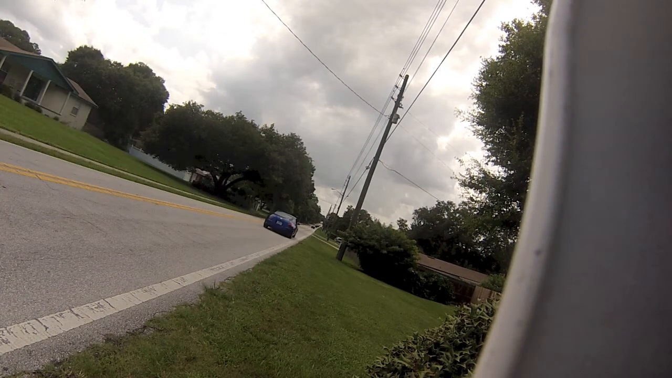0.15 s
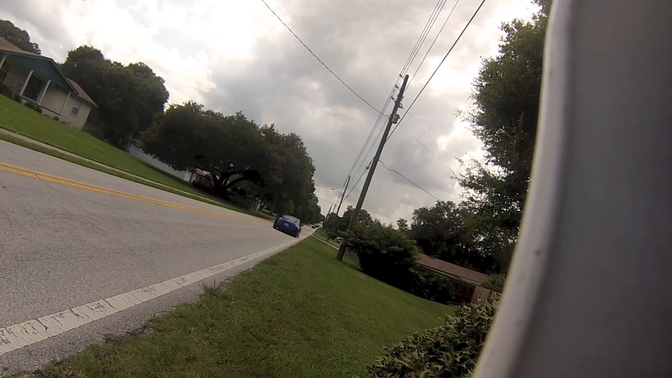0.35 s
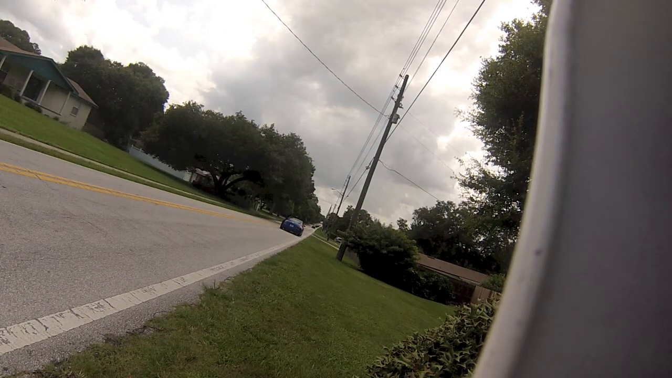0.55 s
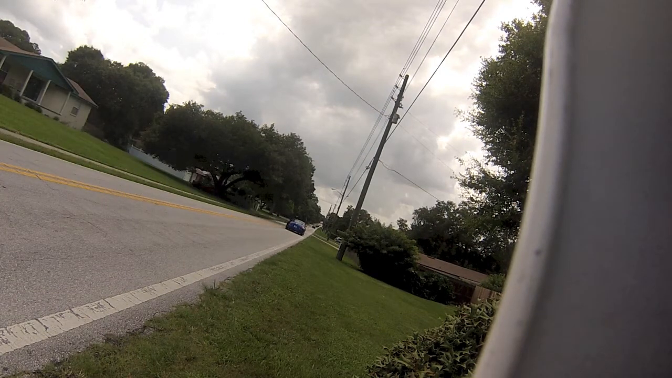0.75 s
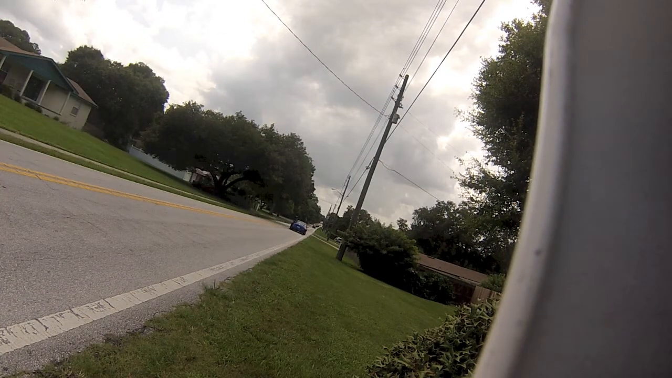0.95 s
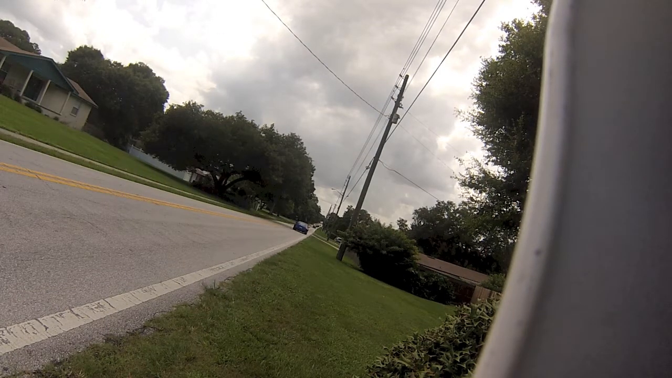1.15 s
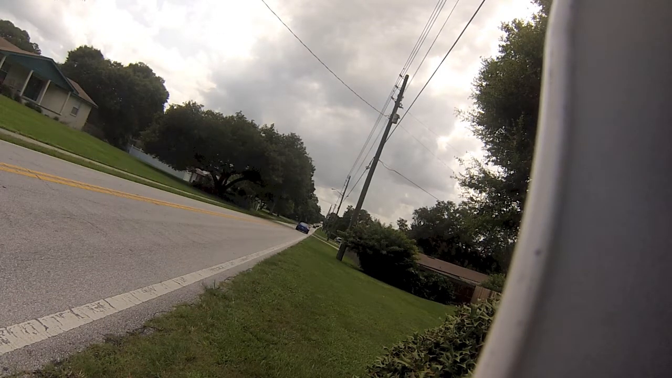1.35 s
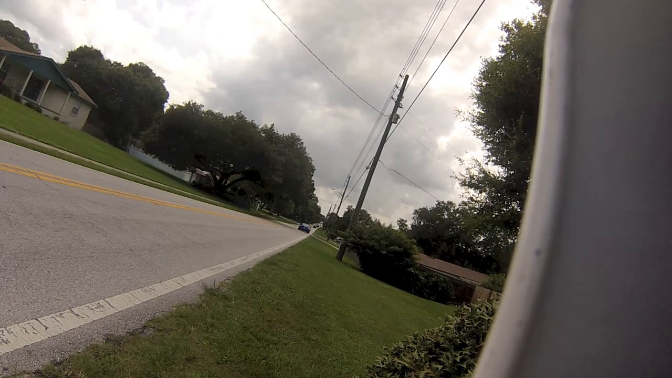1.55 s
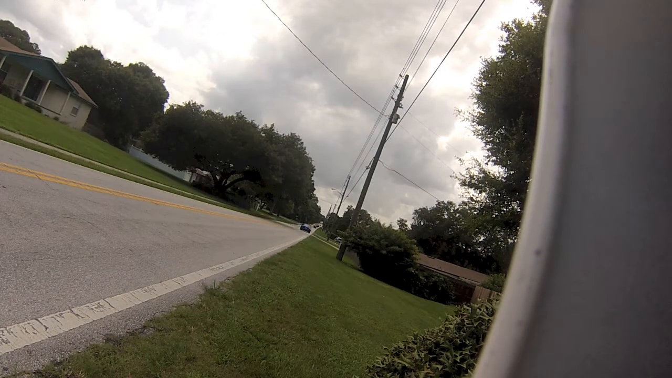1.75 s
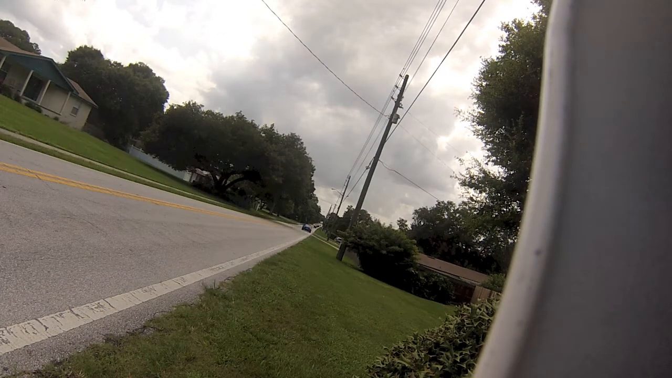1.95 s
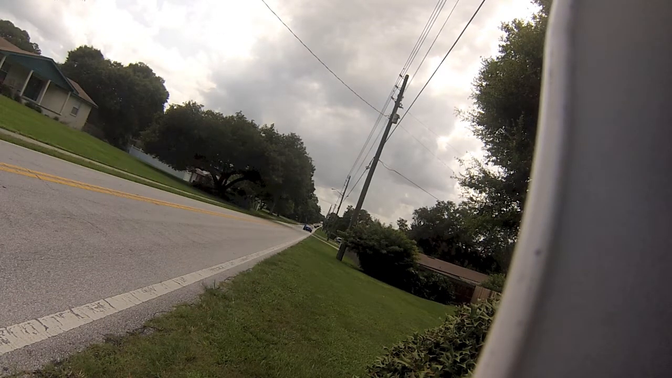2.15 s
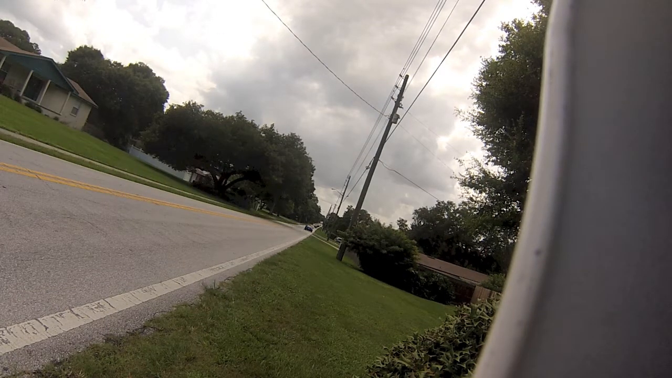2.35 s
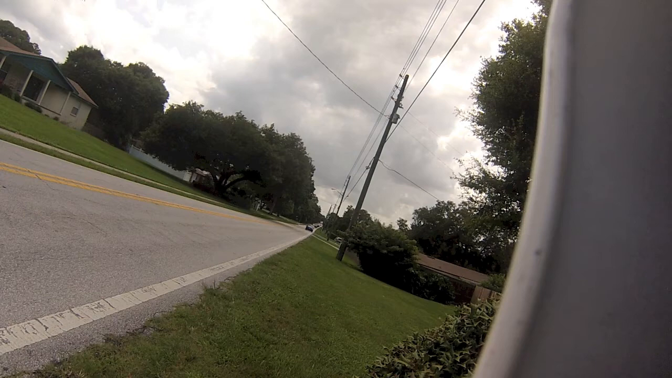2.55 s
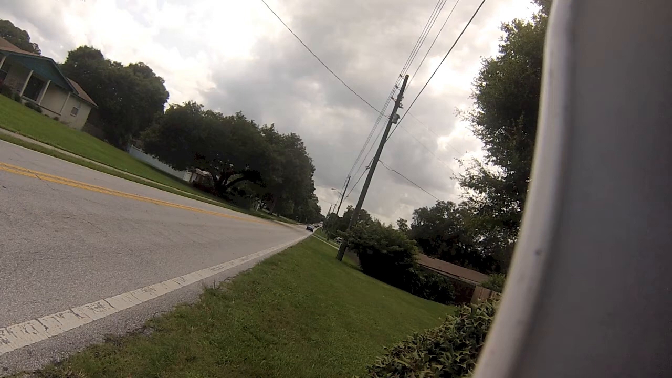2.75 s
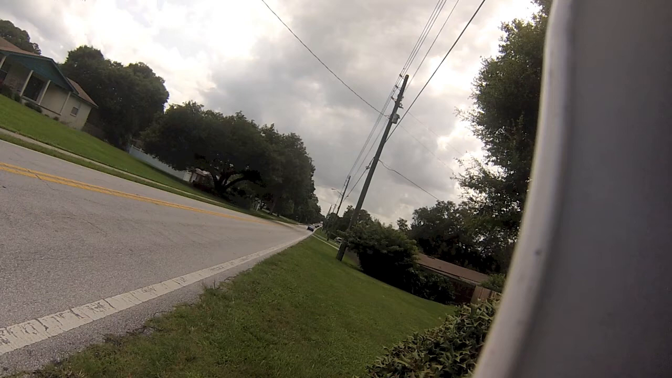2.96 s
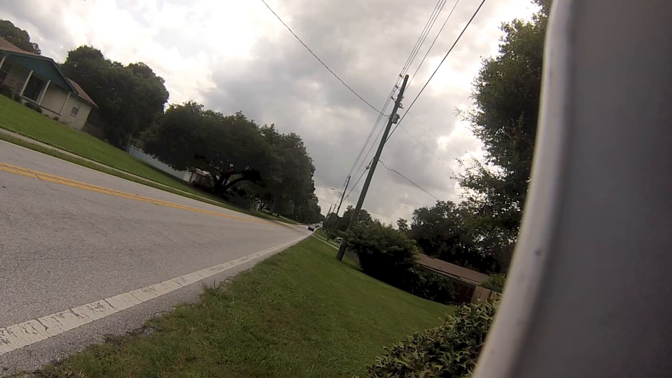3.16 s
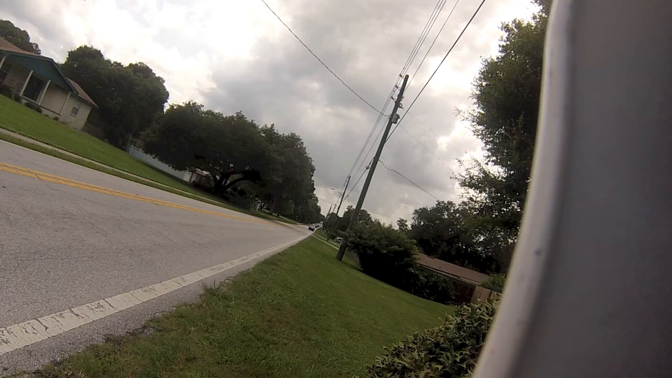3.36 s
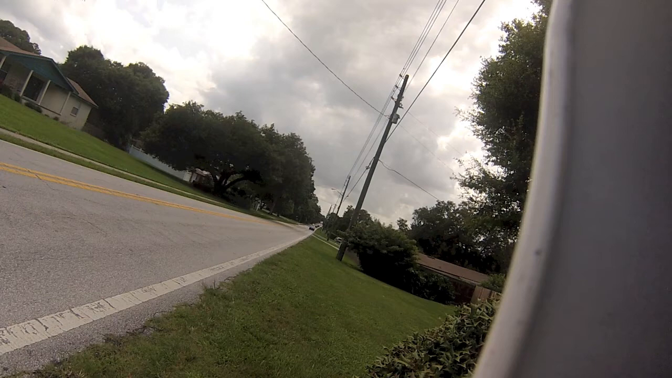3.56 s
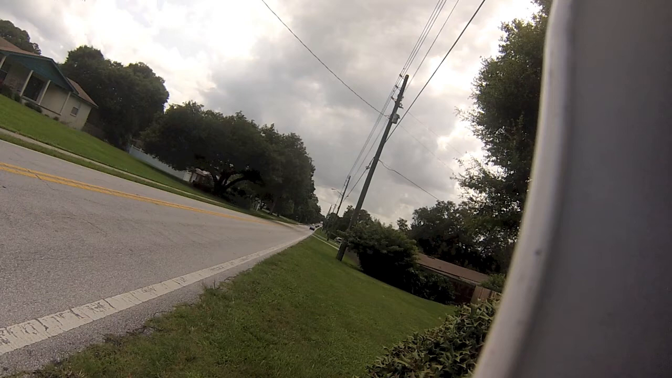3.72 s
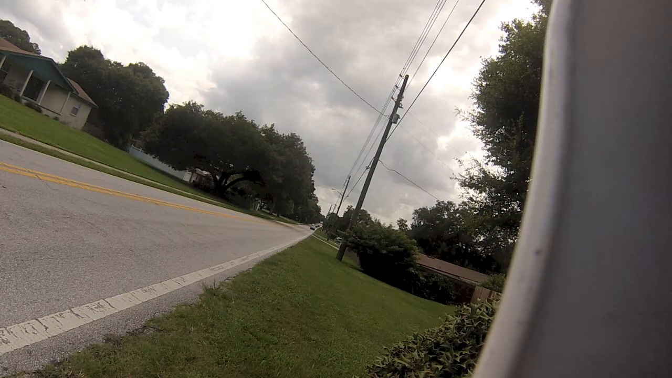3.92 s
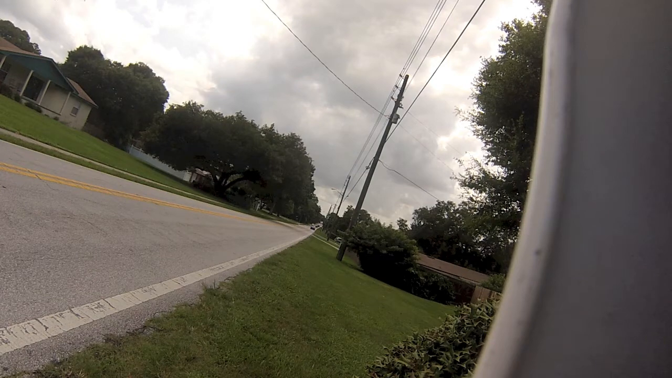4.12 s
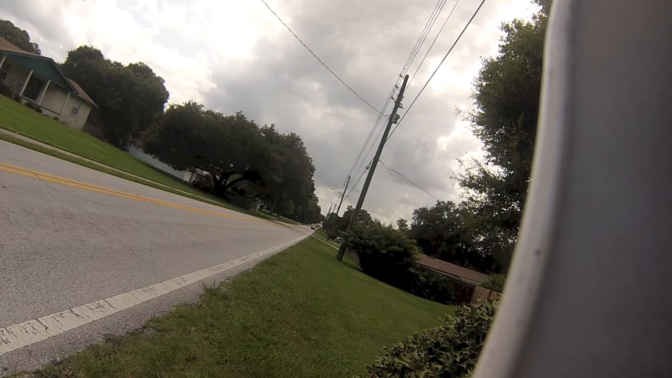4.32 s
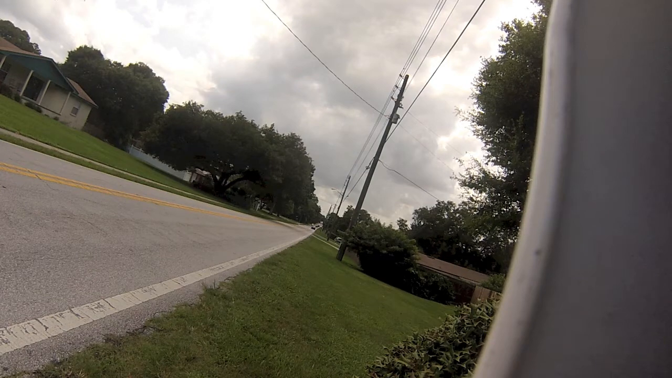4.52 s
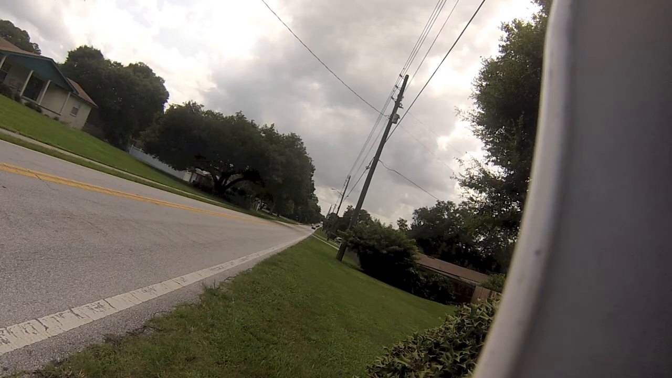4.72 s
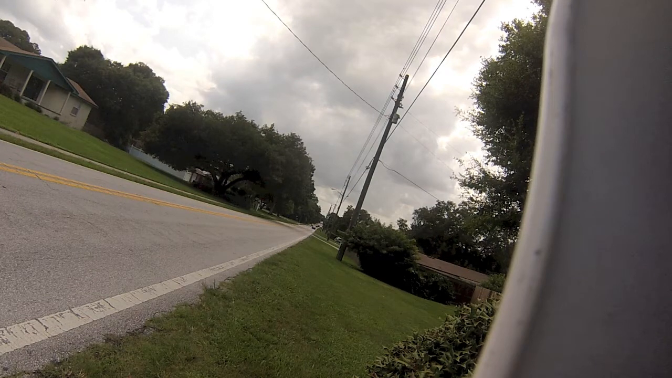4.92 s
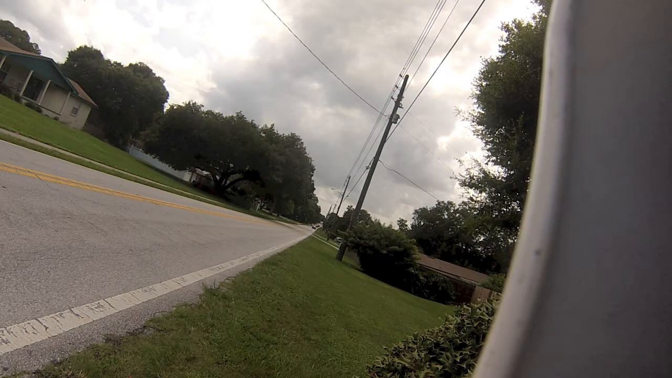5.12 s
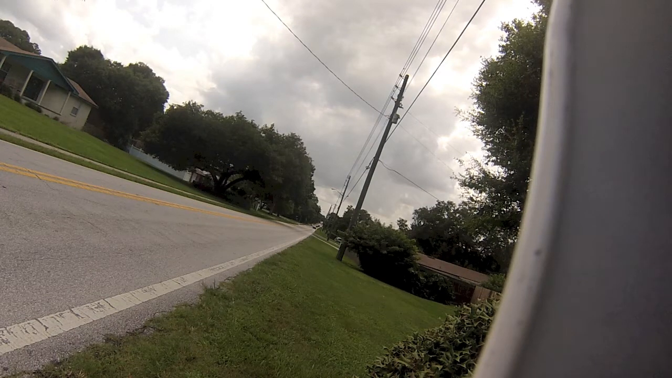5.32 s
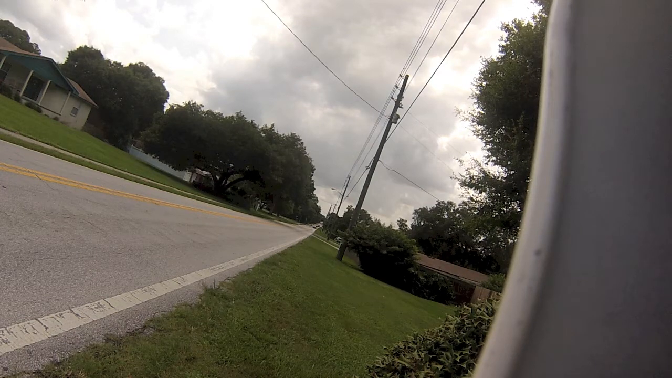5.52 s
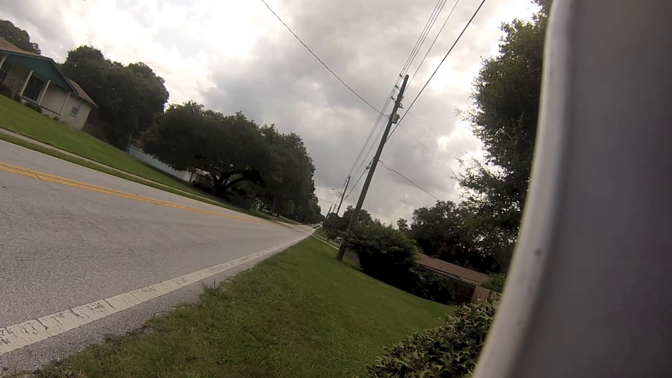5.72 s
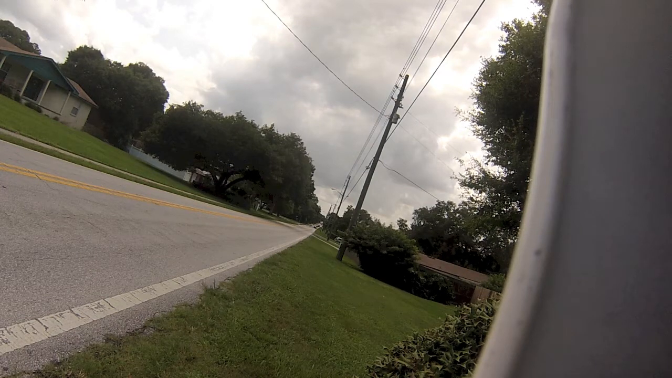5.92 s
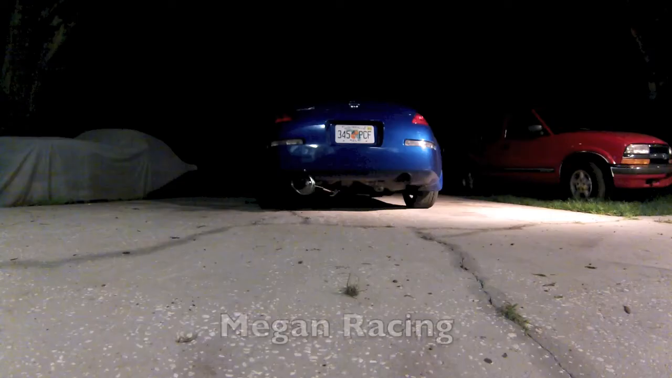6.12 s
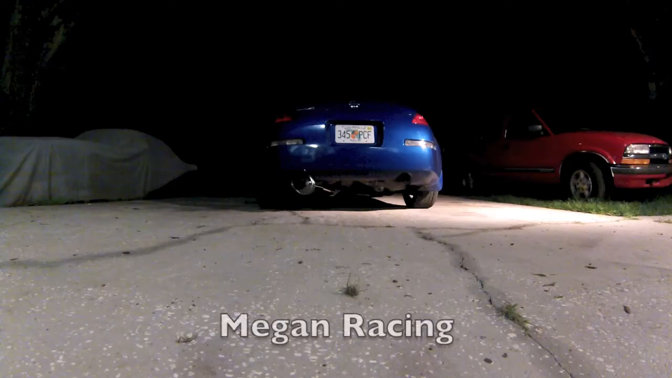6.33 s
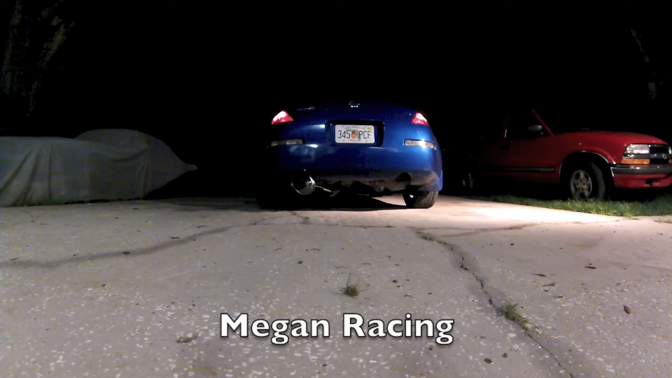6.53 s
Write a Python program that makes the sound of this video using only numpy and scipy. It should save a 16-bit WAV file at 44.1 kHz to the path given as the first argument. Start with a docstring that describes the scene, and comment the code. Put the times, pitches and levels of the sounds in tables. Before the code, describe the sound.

A sports car pulls away down a road, shifts and fades as another car nears, then quiet night air and a starter motor cranking.

```python
"""On a country road a six-cylinder sports car pulls away, lifts off, shifts up and pulls again into the distance.
The engine is a stack of wavering tones locked to the firing rate; tyres, gas and wind are shaped noise.
A tyre roar swells as another car nears, insects sing thinly, and the road fades out.
Then a driveway at night fades in: still air and insects, a soft knock of dying noise, the noisy clack of a starter,
its whine of gear tones that sags once, and the first chuffs of the exhaust as low ringing modes."""
import sys
import numpy as np
from scipy import signal
from scipy.fft import rfft, irfft, next_fast_len
from scipy.io import wavfile
from scipy.ndimage import uniform_filter1d

SR = 44100
rng = np.random.default_rng(int(sys.argv[2]) if len(sys.argv) > 2 else 0)


def inscribe(sig):
    """Save sig as 16-bit PCM at rate SR to the path in sys.argv[1].

    A 1-D sig is mono; a 2-D sig holds one channel per row.
    Samples are clipped to [-1, 1] before scaling.
    """
    pcm = np.round(np.clip(np.atleast_2d(sig).T, -1, 1) * 32767)
    wavfile.write(sys.argv[1], SR, pcm.astype(np.int16))


N = 294588
T = np.arange(N) / SR  # time of each sample, s

# Peaks and hollows from reflections beside the listener: (frequency [Hz], width [Hz], level [dB])
REFLECTIONS = [(315, 20, -3.1), (590, 30, -6.5), (825, 65, 6.3), (925, 35, -9.1), (1155, 120, 5.0),
               (1315, 75, -5.6), (1570, 75, 2.9), (1695, 25, -5.9), (1845, 50, 4.2), (1985, 35, -3.2),
               (2115, 45, 2.3), (2255, 75, -6.6), (2490, 60, -6.4), (2660, 85, 3.3), (3005, 60, 5.4),
               (3230, 45, 1.0), (3485, 40, 3.4), (3875, 130, -3.7), (5455, 315, 4.3), (5765, 40, -3.5),
               (6635, 90, -3.1), (7055, 120, 1.2)]


def exhaust(firing_hz):
    """Gas pulses sound a boom at the firing rate, its echo and octave, and weaker lines at other multiples."""
    # Boom's resonance in the exhaust: (frequency [Hz], level [dB])
    boom_resonance = [(190, -6), (205, 0.5), (215, 1), (229, -3), (243, -5.5), (254, -6), (265, -8),
                      (272, -13), (279, -23)]
    # Resonance that the octave crosses: (frequency [Hz], level [dB])
    octave_resonance = [(390, -23), (412, -16), (444, -16), (468, -5), (490, 0.5), (512, -6.5), (530, -2),
                        (548, -13.5), (564, -19)]
    # Lines from unequal cylinders, six firings to a cycle:
    # (multiple of the cycle rate [-], level against the low lines' gain [dB], roughness [0 = steady])
    low_orders = [(2, -12, 1), (3, -1, 0.3), (4, -8, 0.37), (5, -22, 1), (7, -15.5, 1), (8, -23.5, 1),
                  (9, -18, 0.4), (10, -29, 1), (11, -14, 0.84), (13, -12.5, 0.8), (14, -47.5, 1)]
    # Overtones, most of them of the firing rate:
    # (multiple of the cycle rate [-], level against the high lines' gain [dB], roughness [0 = steady])
    high_orders = [(18, -0.5, 1.3), (21, -18, 0.9), (24, -5, 1), (27, -20, 0.9), (30, -4.5, 0.43),
                   (36, -9, 1)]
    # The muffler's drone lifts any low line that passes through it: (frequency [Hz], width [Hz], level [dB])
    muffler_drone = [(216.4, 27.5, 15.5)]
    # Levels at the starting distance and full throttle, before the resonances
    boom_db, octave_db, low_lines_db, high_lines_db = -13, -23.5, -33, -35.5
    low_lines_db_per_octave = 4  # the low lines grow with engine speed
    high_lines_falloff = 1.79  # power of nearness: the high lines fade faster with distance
    overrun_share = 0.18  # share of the boom left with the throttle shut
    loaded_roughness, added_burble = 0.085, 0.74  # the second comes in as the throttle shuts
    echo_share, echo_shift_hz, echo_fade_s = 0.4, 3.16, 1.8

    gas = throttle()
    effort = overrun_share + (1 - overrun_share) * gas
    burble = loaded_roughness + added_burble * (1 - gas) ** 1.8
    firings = np.cumsum(firing_hz) / SR
    cycles = firings / 6
    cycle_hz = firing_hz / 6

    # The roadside echo is less Doppler-shifted, so it beats against the boom; it dies as the car leaves
    echo_tone = line(firings + echo_shift_hz * T, rough=0.45, flutter_hz=29)
    echo = echo_share * np.exp(-T / echo_fade_s) * echo_tone
    boom_gain = amp(boom_db + read(boom_resonance, firing_hz))
    boom = boom_gain * (line(firings, rough=burble, flutter_hz=32.3) - echo)
    octave_gain = amp(octave_db + read(octave_resonance, 2 * firing_hz))
    octave = octave_gain * line(2 * firings, rough=0.35, flutter_hz=12)

    low = sum(amp(db + peaks(muffler_drone, k * cycle_hz)) * line(k * cycles, rough, flutter_hz=2.6)
              for k, db, rough in low_orders)
    # These glow and fade as they cross the reflections' peaks and hollows
    high = sum(amp(db + peaks(REFLECTIONS, k * cycle_hz)) * line(k * cycles, rough, flutter_hz=10.0)
               for k, db, rough in high_orders)
    pulling = np.clip((gas - 0.35) / 0.32, 0, 1)  # overtones need the engine under load
    octaves_up = np.log2(firing_hz / firing_hz[0])
    low_gain = gas * amp(low_lines_db + low_lines_db_per_octave * octaves_up)
    high_gain = pulling * amp(high_lines_db) * nearness() ** high_lines_falloff
    return nearness() * (effort * boom + low_gain * low + pulling * octave) + high_gain * high


def firing_rate():
    """Firings per second through a long pull, a lift and upshift, a gentler pull, then coasting."""
    # Engine speed: (time [s], firing rate [Hz])
    firing_track = [(0, 192.8), (0.4, 212.8), (0.85, 233), (1.5, 256.4), (2.24, 286.8), (2.42, 276.4),
                    (2.9, 238.1), (3.03, 204.6), (3.5, 216.4), (4.25, 231.4), (4.55, 227.6), (6.05, 219.3)]
    return curves(firing_track)[0]


def throttle():
    """How far the driver's foot opens the throttle, 0-1."""
    # The driver's foot: (time [s], throttle [0-1])
    foot = [(2.24, 0.96), (2.38, 0.28), (2.95, 0.46), (3.05, 0.95), (3.9, 0.62), (4.48, 0.56), (4.68, 0)]
    return np.clip(curves(foot)[0], 0, 1)


def nearness():
    """Sound weakens in proportion to distance as the car drives straight away; gain 1 at the start."""
    start_m, speed_m_per_s = 18.44, 18.64
    return start_m / (start_m + speed_m_per_s * T)


def road(firing_hz):
    """Tyre roar, a low rush of gas and air, and hiss that pulses with the firings under load."""
    # Road noise: (time [s], tyre roar level [dB], hiss level [dB])
    road_levels = [(0, -34.5, -39.5), (.35, -36.5, -45), (.6, -41, -43), (1.0, -38.5, -44),
                   (2.2, -40.5, -45.5), (2.4, -39, -51), (3.3, -40, -51), (3.9, -37.5, -48.5),
                   (4.9, -44.5, -55)]
    # Spectrum of the tyre roar: (frequency [Hz], level per Hz [dB])
    roar_spectrum = [(350, -22), (500, -0.5), (700, -3.5), (850, 3), (1130, 3), (1400, -3), (1850, -14),
                     (2400, -21.5), (4000, -52)]
    # Spectrum of the low rush: (frequency [Hz], level per Hz [dB])
    rush_spectrum = [(50, -2), (100, 5.5), (170, -14.5), (230, 16.5), (300, 2), (380, -7.5), (480, 12.5),
                     (700, -6), (1000, 0), (1800, -42)]
    # Spectrum of the hiss: (frequency [Hz], level per Hz [dB])
    hiss_spectrum = [(1100, -5.5), (1650, 8.5), (2300, 2.5), (2900, 1.5), (3900, -2.5), (5400, -6.5),
                     (6500, -10.5), (7600, -17), (9200, -28.5), (10400, -22.5), (11300, -28.5),
                     (13000, -36), (15000, -36)]
    # Spectrum of the throttle's fizz: (frequency [Hz], level per Hz [dB])
    fizz_spectrum = [(3600, -25), (4450, 10), (5200, 7.5), (6000, -1), (7400, 3), (8800, -5.5),
                     (10000, -0.5), (12200, -9), (14000, -28.5), (15000, -25)]
    rush_db, fizz_db = -28.5, -47  # at the starting distance; the fizz at full throttle

    gas, near = throttle(), nearness()
    roar_db, hiss_db = curves(road_levels)
    roar = amp(roar_db) * noise(roar_spectrum, patchy_db=0.26, roadside=True)
    rush = amp(rush_db) * near ** 1.94 * noise(rush_spectrum, patchy_db=-2.4, roadside=True)
    hiss = amp(hiss_db) * noise(hiss_spectrum, patchy_db=0.76, roadside=True)
    fizz = amp(fizz_db) * near * gas ** 3.4 * noise(fizz_spectrum, roadside=True)
    rasp = 1 + 0.18 * gas * near * np.cos(2 * np.pi * np.cumsum(firing_hz) / SR)
    return roar + rush + (hiss + fizz) * rasp


def starter():
    """The pinion clacks in, the gears whine up and sag against compression, and the pipe chuffs."""
    # Solenoid and pinion strike home: (time [s], level [dB], time to fall 60 dB [s])
    clack_blows = [(6.378, -41.5, 0.23), (6.386, -31.5, 0.18), (6.417, -30, 0.23)]
    # Spectrum of the clacks: (frequency [Hz], level per Hz [dB])
    clack_spectrum = [(60, -5), (200, 4), (500, -6), (1200, 2), (2200, 0.5), (2800, 6.5), (3300, -1.5),
                      (4300, -1), (5300, -12), (7500, -12), (11000, -17.5), (15000, -19)]
    # Whine of the gear teeth: (multiple of the gear-mesh rate [-], level against the whine's gain [dB])
    gear_tones = [(1, -16), (2, -3.5), (4, -6.5), (7, -18), (8, -3.5), (10, -16)]
    # Spectrum of the gear rattle: (frequency [Hz], level per Hz [dB])
    rattle_spectrum = [(60, -17), (200, -0.5), (400, -3.5), (1000, -1), (2000, -1.5), (2500, -6.5),
                       (3300, -0.5), (4500, -11.5), (7000, -17.5), (10000, -23), (15000, -30)]
    # First puffs from the tailpipe: (time [s], level [dB])
    puffs = [(6.557, -26.5), (6.598, -33), (6.639, -57)]
    # The pipe's low modes: (frequency [Hz], level against the puff [dB], time to fall 60 dB [s])
    pipe_modes = [(25.1, 0, 0.32), (63.8, -1.5, 0.3)]
    # The motor spins up towards its free gear-mesh rate; the pinion meshes a moment later
    motor_on_s, meshed_s, free_mesh_hz, spin_up_s = 6.405, 6.42, 790, 0.168
    # The first compression stroke drags it down; the sag is the share of speed lost
    compression_s, half_width_s, sag = 6.68, 0.053, 0.335
    # Gear levels, and how much each gains under compression
    whine_db, whine_strain_db, rattle_db, rattle_strain_db = -39, 8.5, -40.5, 3

    blows = sum(amp(db) * dying(s, t60) for s, db, t60 in clack_blows)
    clacks = noise(clack_spectrum, patchy_db=4.0) * blows

    strain = np.exp(-((T - compression_s) / half_width_s) ** 2)
    spin_up = 1 - np.exp(-np.maximum(T - motor_on_s, 0) / spin_up_s)
    speed = spin_up * (1 - sag * strain)
    teeth = np.cumsum(free_mesh_hz * speed) / SR  # count of teeth met so far
    tones = sum(amp(db) * line(k * teeth, rough=1.2, flutter_hz=130) for k, db in gear_tones)
    whine = speed * amp(whine_db + whine_strain_db * strain) * tones
    tooth_pulse = 1 + 0.32 * np.cos(2 * np.pi * teeth)
    rattle_gain = amp(rattle_db + rattle_strain_db * strain)
    rattle = rattle_gain * noise(rattle_spectrum, patchy_db=1.0) * tooth_pulse

    chuffs = sum(ring(s, hz, db + mode_db, t60) for s, db in puffs for hz, mode_db, t60 in pipe_modes)
    return clacks + (T > meshed_s) * (whine + rattle) - chuffs  # each chuff swings downward first


def surroundings():
    """Gusts on the microphone, thin insect song and the hollow tyre roar of a nearing car."""
    # Gusts, the first being the car's wake: (time [s], level above the breeze [dB])
    gusts = [(0, 6), (.55, 6), (1.57, 5.5), (2.65, 1)]
    # Spectrum of the wind: (frequency [Hz], level per Hz [dB])
    wind_spectrum = [(10, -8.5), (25, 6), (60, 7), (110, -2.5), (200, 3), (400, -46.5)]
    # Another car draws near: (time [s], level [dB])
    traffic_levels = [(4.5, -41.5), (4.9, -39), (5.2, -36.5), (5.5, -33.5), (5.75, -32), (5.9, -29.5),
                      (6.05, -33)]
    # Spectrum of its tyre roar: (frequency [Hz], level per Hz [dB])
    traffic_spectrum = [(40, -20), (90, 7.5), (140, -0.5), (215, 8.5), (290, -9.5), (380, 1.5), (480, -4.5),
                        (770, 2.5), (1050, -5), (1450, -7.5), (2300, -18), (3700, -19.5), (6000, -29),
                        (15000, -52)]
    breeze_db, gust_half_length_s = -44.5, 0.26
    song_hz, song_width_hz, song_db = 10330, 1100, -73  # insects in the roadside trees

    gusts_db = sum(db * np.exp(-((T - s) / gust_half_length_s) ** 2) for s, db in gusts)
    wind = amp(breeze_db + gusts_db) * noise(wind_spectrum)
    song = amp(song_db) * line(song_hz * T, rough=10, flutter_hz=song_width_hz / 2)
    traffic_gain = amp(curves(traffic_levels)[0])
    traffic = traffic_gain * noise(traffic_spectrum, patchy_db=1.0, roadside=True)
    return wind + song + traffic


def night():
    """Still air as faint noise, insect song as thin fluttering bands, and one soft hollow knock."""
    # Spectrum of the night air: (frequency [Hz], level per Hz [dB])
    air_spectrum = [(20, 3), (70, 3), (140, -4.5), (300, -16.5), (1000, -23), (2500, -30), (8000, -37),
                    (15000, -38)]
    # Bands of insect song: (frequency [Hz], width [Hz], level [dB])
    insect_bands = [(6800, 760, -62.5), (3060, 290, -75)]
    # Spectrum of the knock: (frequency [Hz], level per Hz [dB])
    knock_spectrum = [(250, -28), (460, -12), (555, 7), (680, -7), (900, -30), (1400, -25), (3000, -44)]
    air_db = -49.5
    knock_s, knock_db, knock_t60_s = 6.21, -45, 0.23

    air = amp(air_db) * noise(air_spectrum)
    song = sum(amp(db) * line(hz * T, rough=3.3, flutter_hz=width / 2) for hz, width, db in insect_bands)
    knock = amp(knock_db) * dying(knock_s, knock_t60_s) * noise(knock_spectrum)
    return air + song + knock


def line(turns, rough, flutter_hz):
    """A tone of rms 1, part steady and part scattered by many paths."""
    angle = 2 * np.pi * turns
    in_step = (np.sqrt(2) + rough * drift(flutter_hz)) * np.cos(angle)
    out_of_step = rough * drift(flutter_hz) * np.sin(angle)
    return (in_step + out_of_step) / np.sqrt(1 + rough ** 2)


def noise(spectrum, patchy_db=0, roadside=False):
    """Noise of rms 1 with a spectrum and brief patches of turbulence."""
    _, _, cells = signal.stft(rng.standard_normal(N), SR, nperseg=512)
    # Smooth chance over neighbouring frequencies, then times, so the patches have some size
    patches = uniform_filter1d(rng.standard_normal(cells.shape), size=6, axis=0)
    patches = unit(uniform_filter1d(patches, size=5, axis=1))
    patchy = signal.istft(cells * amp(patchy_db * patches), SR, nperseg=512)[1][:N]
    f = np.fft.rfftfreq(N, 1 / SR)
    db = read(spectrum, f)
    if roadside:
        db = db + peaks(REFLECTIONS, f)
    return unit(irfft(rfft(patchy) * amp(db), N))


def drift(hz):
    """Slow chance of rms 1, wandering up to about this rate."""
    size = next_fast_len(N)
    f = np.fft.rfftfreq(size, 1 / SR)
    slow = rfft(rng.standard_normal(size)) * np.exp(-(f / hz) ** 2)
    return unit(irfft(slow, size)[:N])


def dying(s, t60, rise=0.0011):
    """Envelope of a blow at time s: a quick rise, then a fall of 60 dB every t60 seconds."""
    age = np.maximum(T - s, 0)
    return (1 - np.exp(-age / rise)) * 1000.0 ** (-age / t60)


def ring(s, hz, db, t60):
    """One mode struck at time s, a sine that dies away."""
    return amp(db) * dying(s, t60) * np.sin(2 * np.pi * hz * (T - s))


def peaks(rows, hz):
    """The dB that a set of peaks and hollows adds at each frequency."""
    return sum(db * np.exp(-0.5 * ((hz - centre) / width) ** 2) for centre, width, db in rows)


def read(points, hz):
    """A spectrum's dB at the given frequencies, joined by straight lines over log frequency."""
    f, db = np.transpose(points)
    return np.interp(np.log(hz + 1), np.log(f), db)


def curves(rows):
    """Each column after the time column of a table, as a curve over time."""
    s, *columns = np.transpose(rows)
    return [np.interp(T, s, column) for column in columns]


def amp(db):
    """Decibels to gain."""
    return 10 ** (np.asarray(db) / 20)


def unit(x):
    """Scales to rms 1."""
    return x / np.sqrt(np.mean(x ** 2) + 1e-20)


def scene():
    """The road fades out and the driveway fades in."""
    road_fade_s, driveway_fade_s = (5.995, 6.05), (6.048, 6.17)  # start and end of each fade
    firing_hz = firing_rate()
    day = exhaust(firing_hz) + road(firing_hz) + surroundings()
    driveway = night() + starter()
    faded_day = day * np.interp(T, road_fade_s, (1, 0))
    faded_driveway = driveway * np.interp(T, driveway_fade_s, (0, 1))
    return (faded_day + faded_driveway)[None]


def record(dry):
    """The recorder's band limit: a steep filter removes the highest treble."""
    edge_hz = 15250
    lowpass = signal.firwin(511, edge_hz, window=("kaiser", 9), fs=SR)
    return signal.oaconvolve(dry, lowpass[None], "same")


dry = scene()
out = record(dry)
inscribe(out)
```